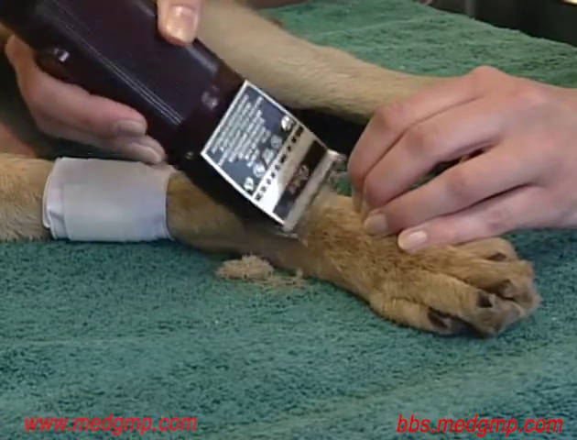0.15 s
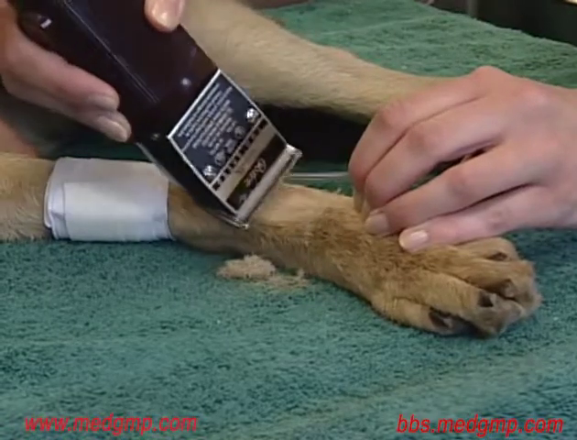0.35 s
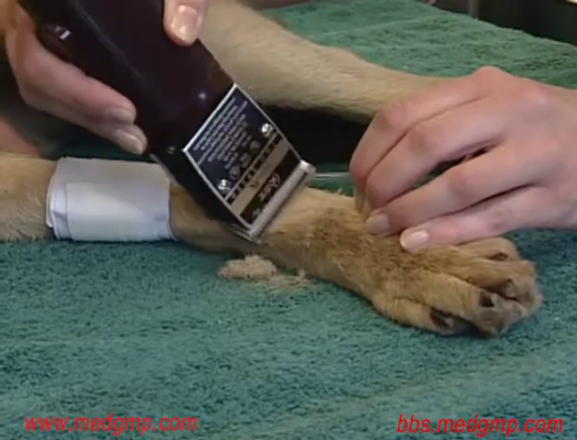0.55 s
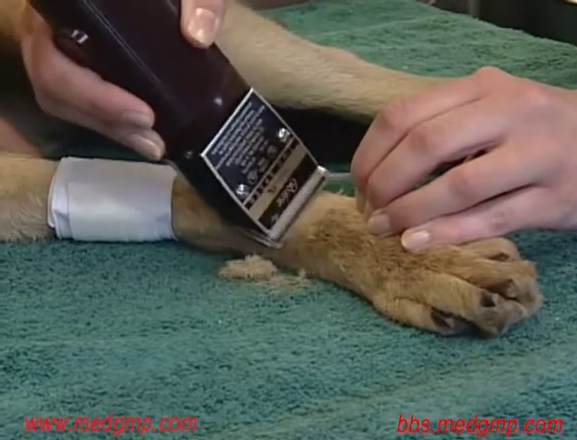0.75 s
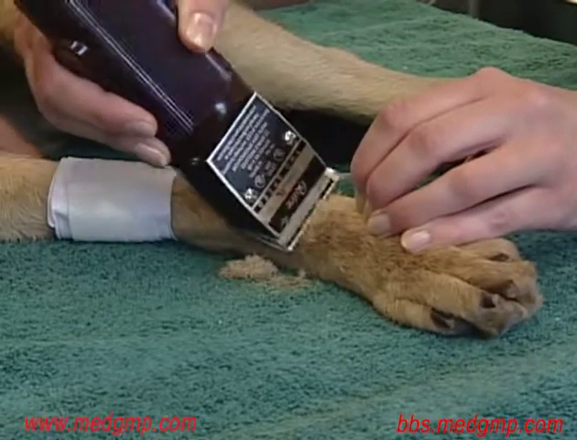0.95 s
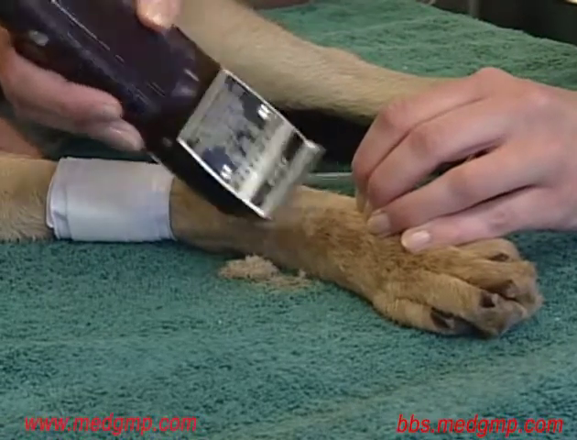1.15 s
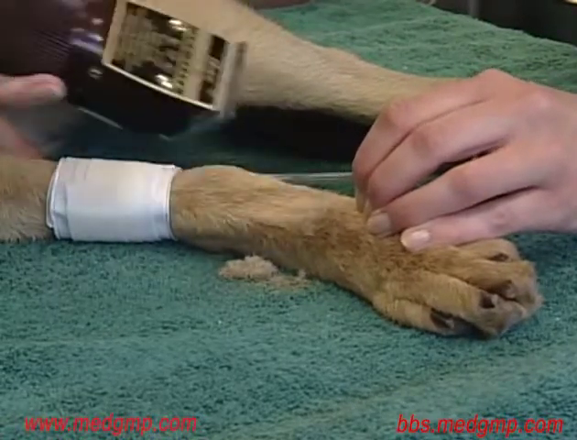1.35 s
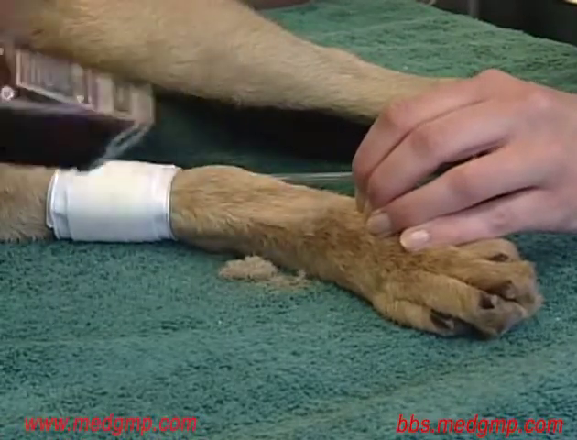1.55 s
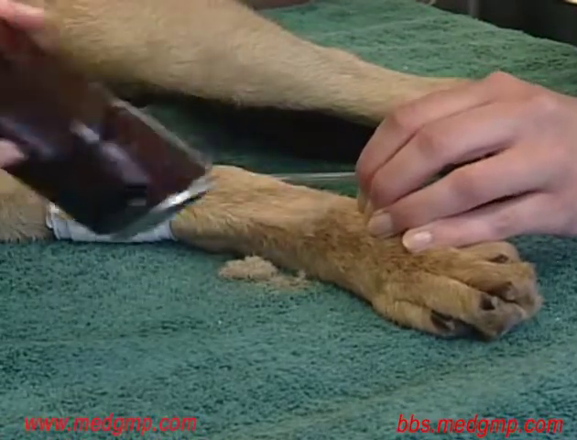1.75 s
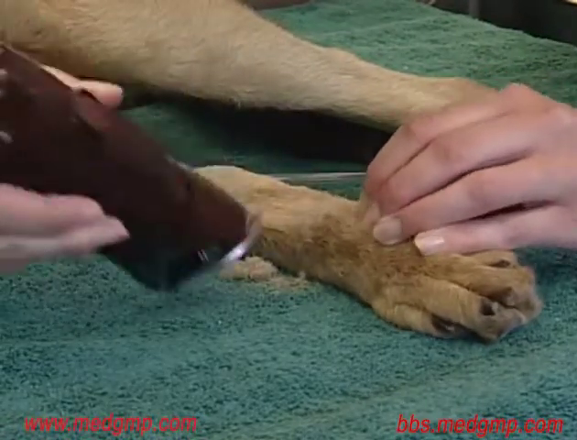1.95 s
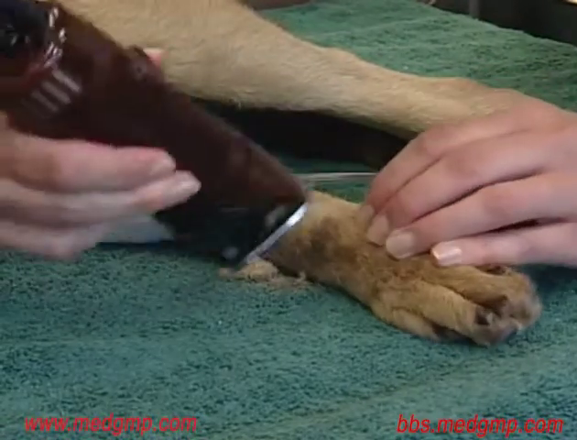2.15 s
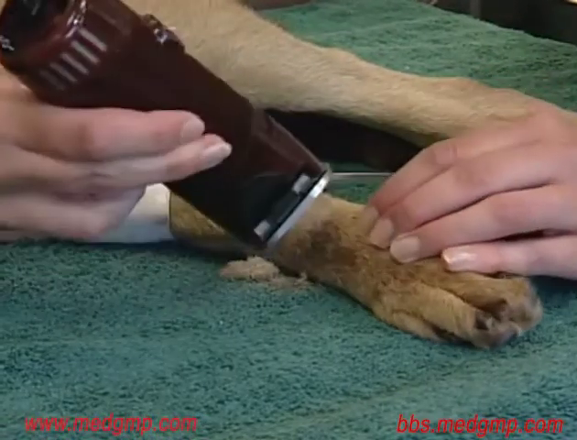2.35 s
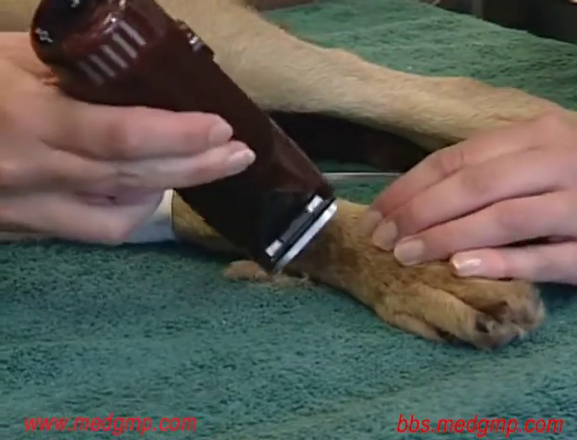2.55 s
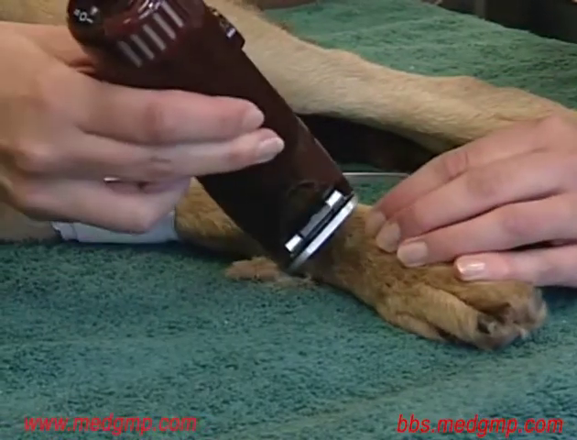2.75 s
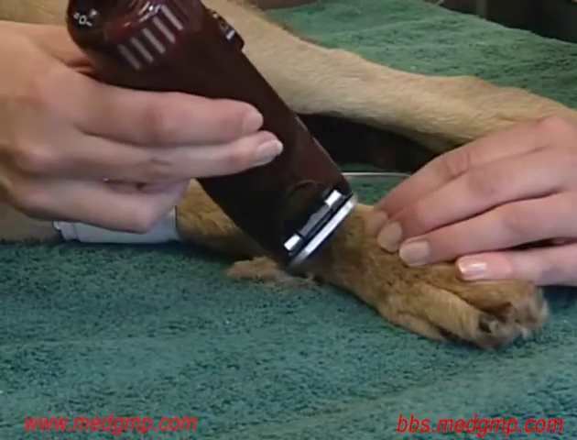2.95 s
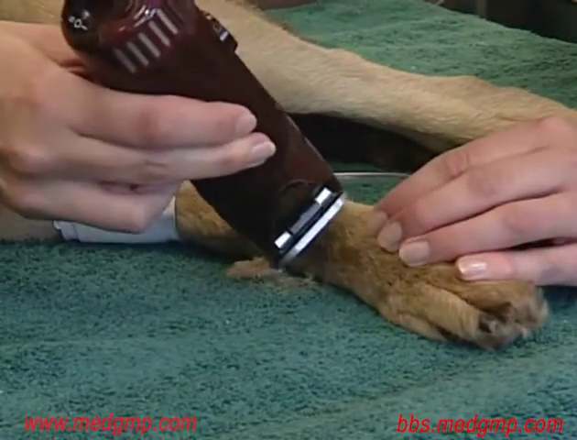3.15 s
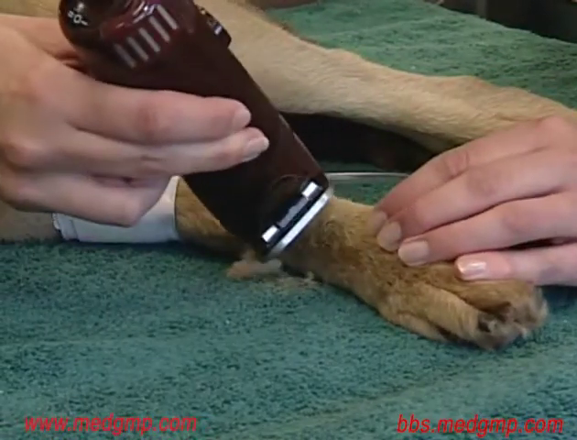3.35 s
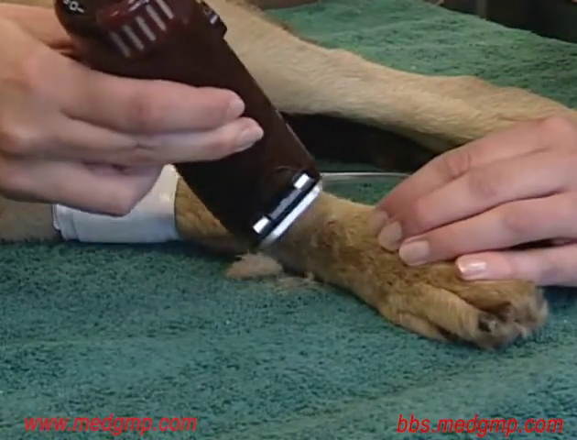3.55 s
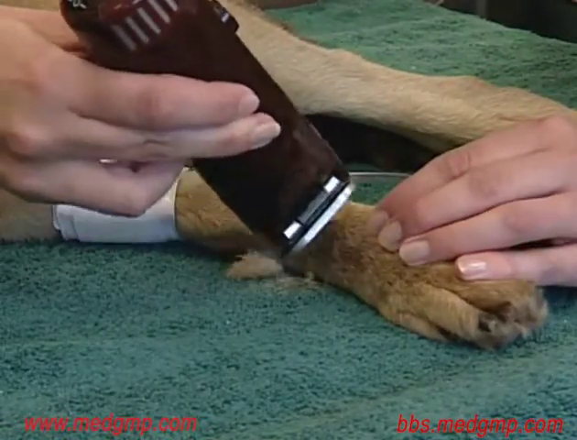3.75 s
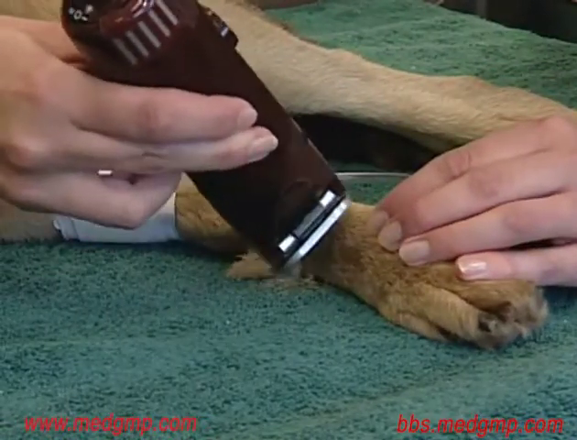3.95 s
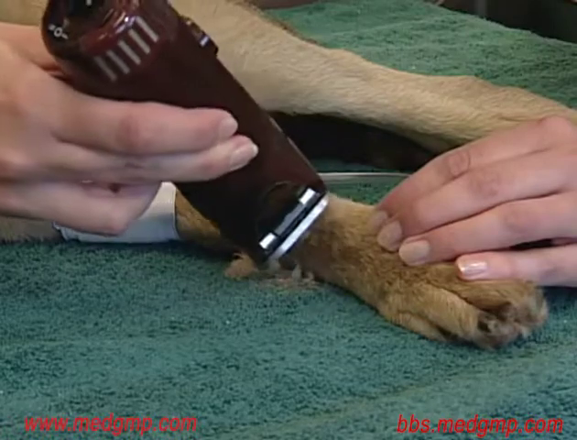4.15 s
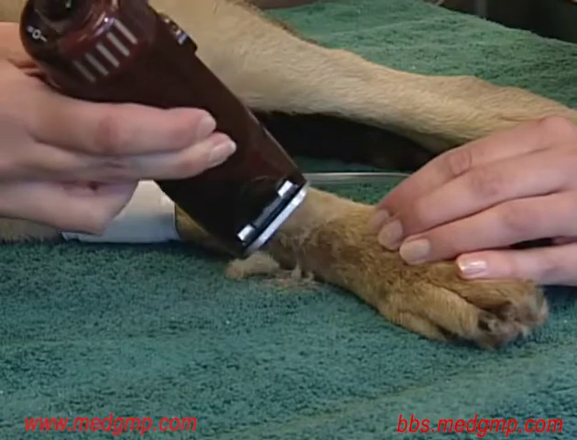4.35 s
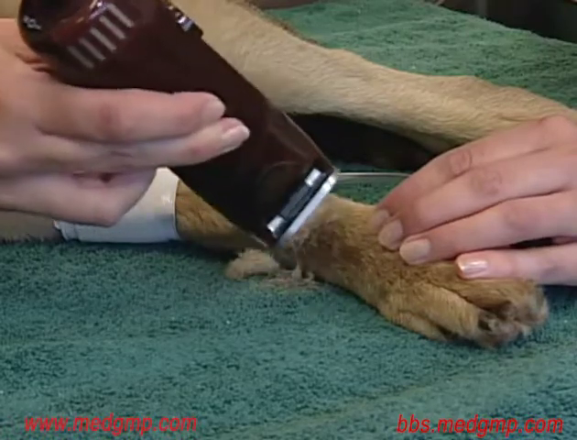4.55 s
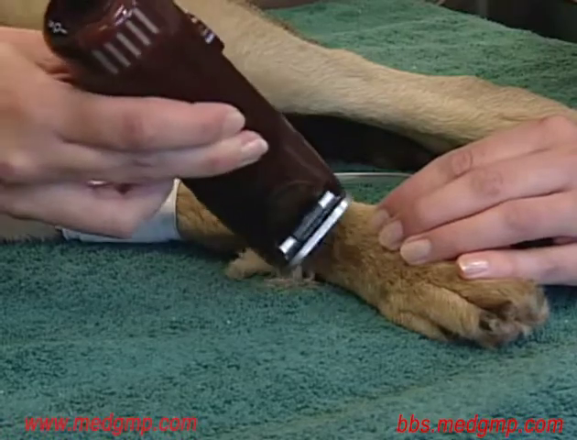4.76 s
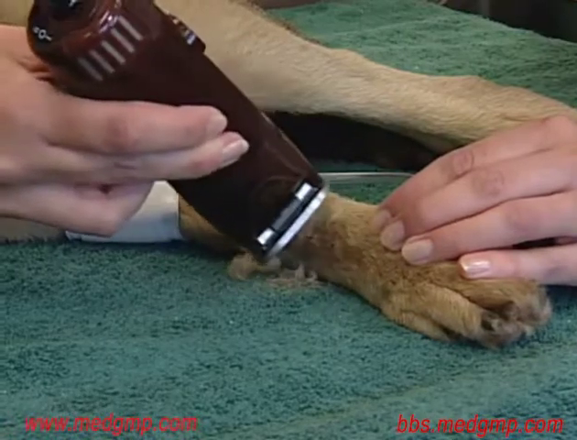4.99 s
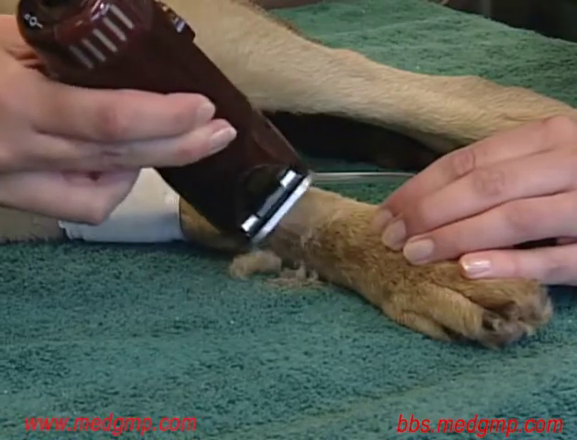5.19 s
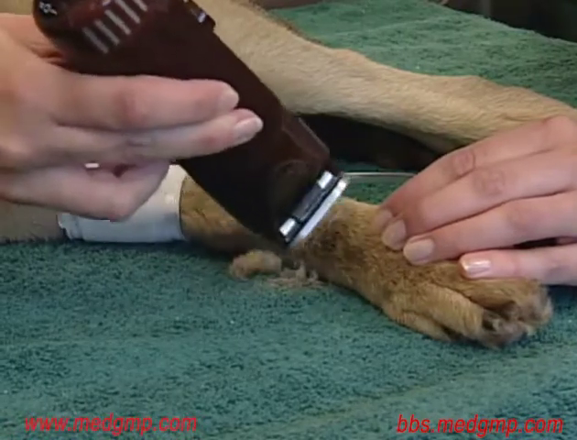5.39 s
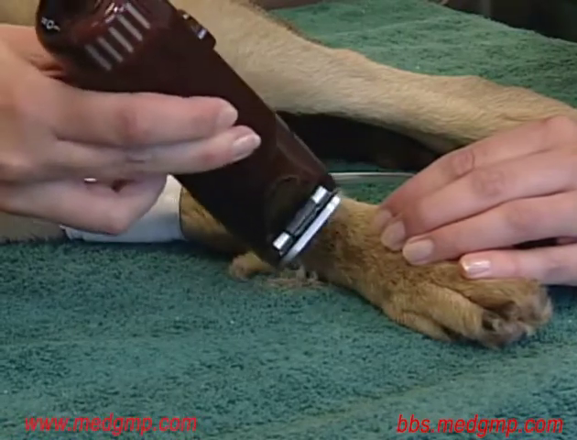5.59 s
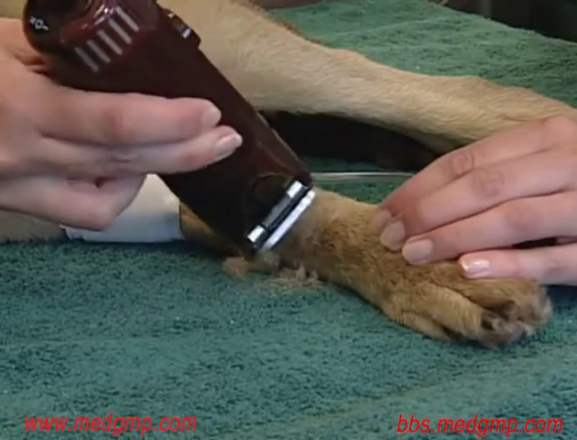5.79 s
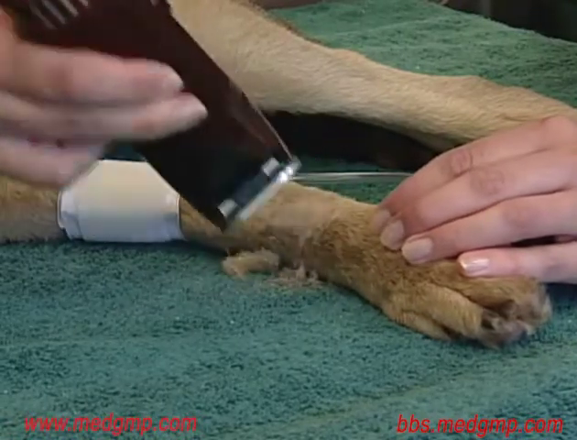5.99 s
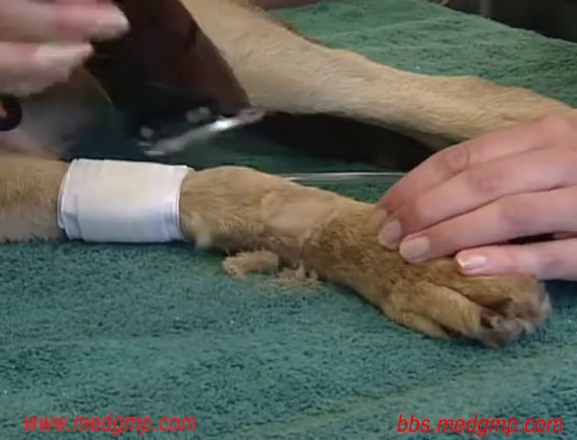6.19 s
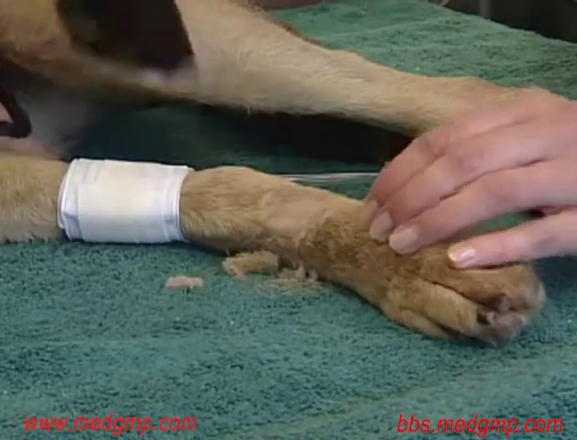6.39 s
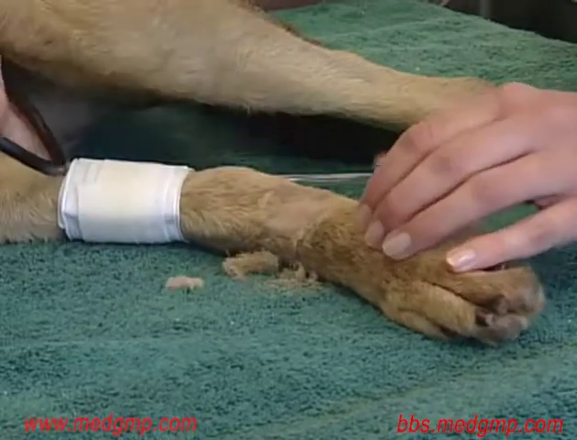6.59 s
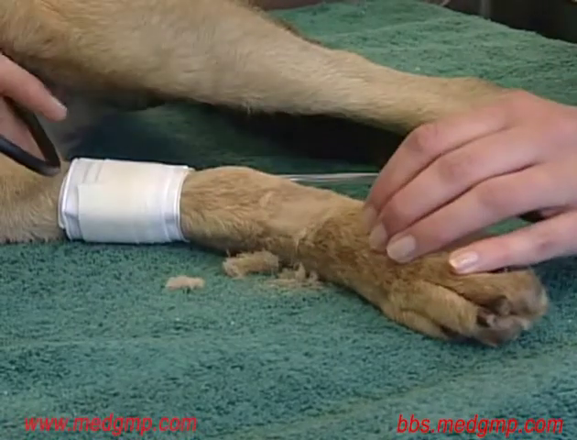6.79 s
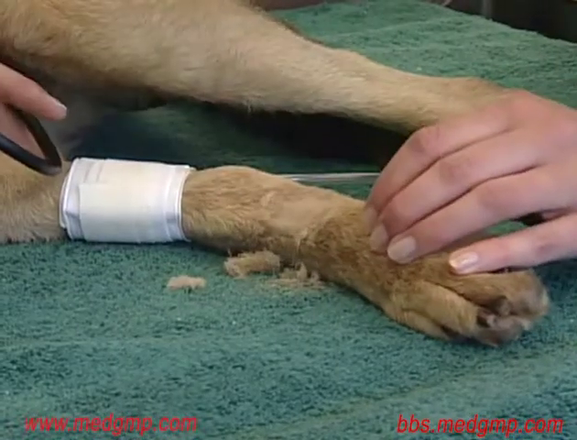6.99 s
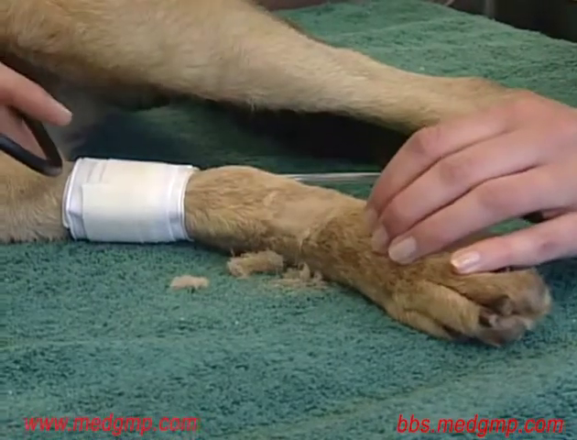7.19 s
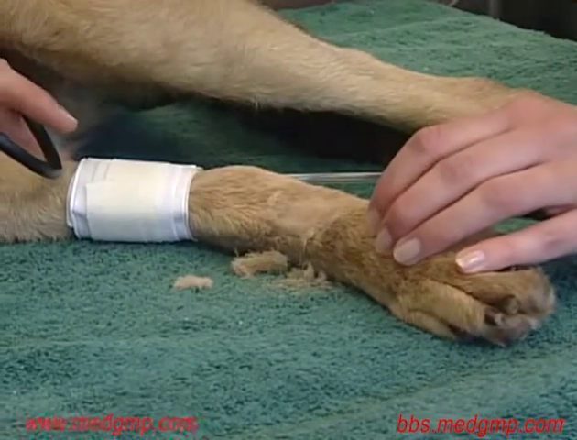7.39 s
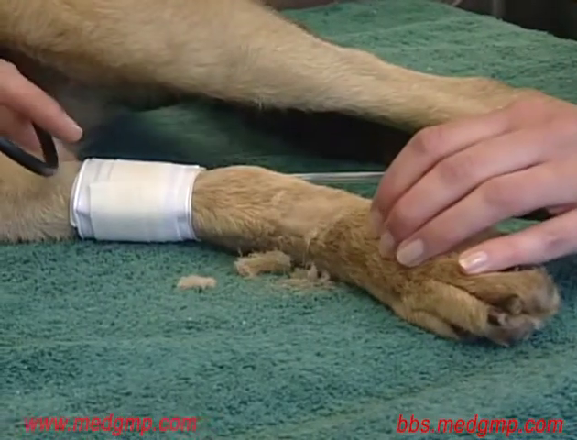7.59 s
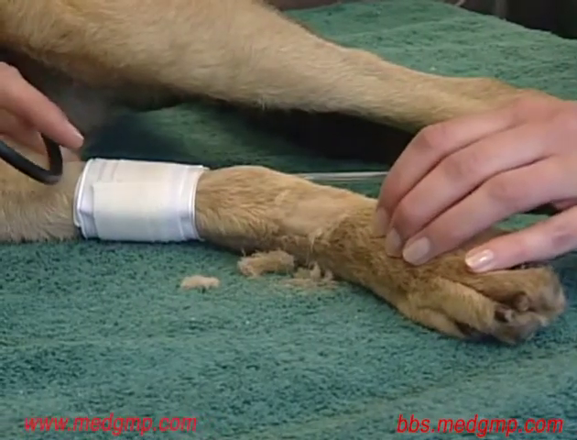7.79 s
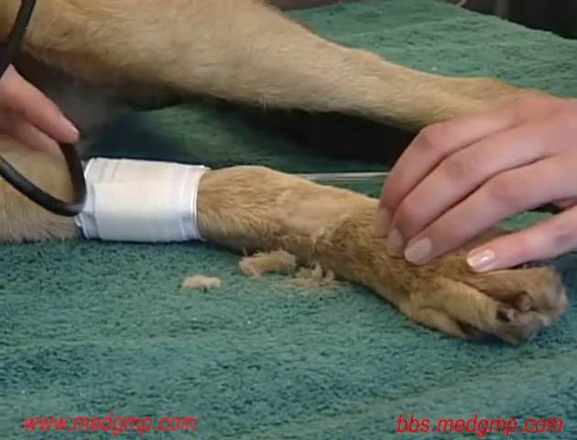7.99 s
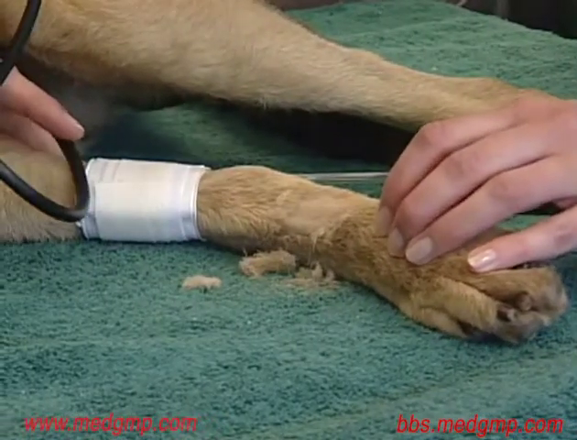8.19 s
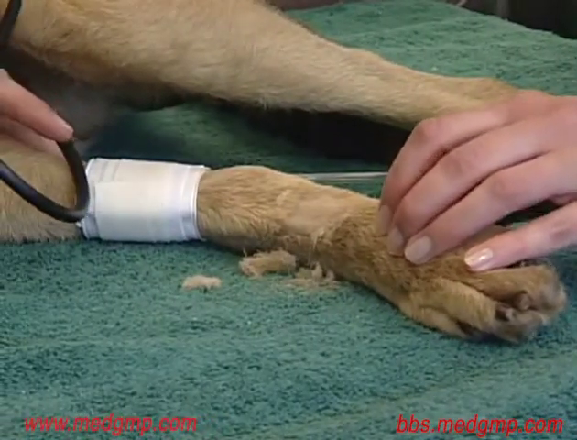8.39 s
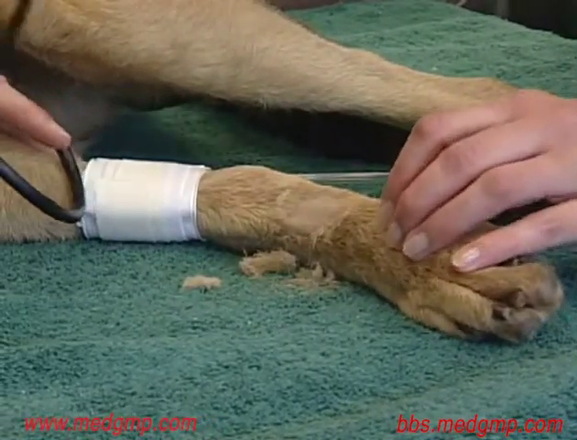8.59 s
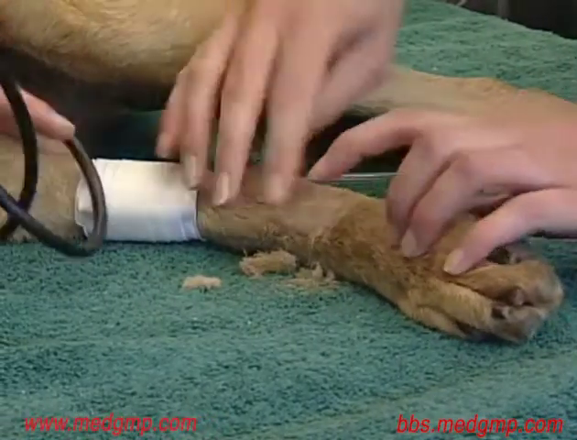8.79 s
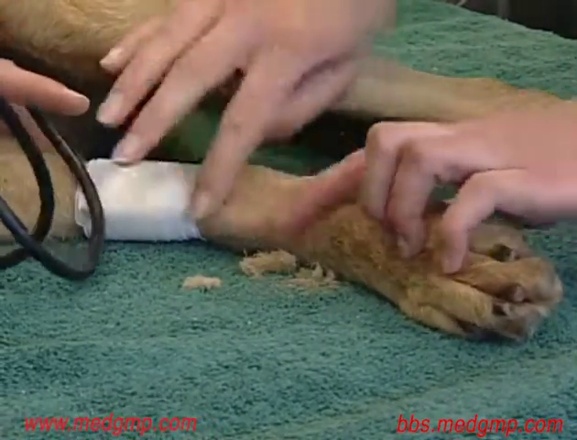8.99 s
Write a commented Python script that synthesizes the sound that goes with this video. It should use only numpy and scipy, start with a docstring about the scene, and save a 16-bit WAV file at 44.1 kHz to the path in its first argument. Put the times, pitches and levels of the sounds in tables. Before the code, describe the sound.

A harsh mains clipper drone with rattling blade and sharp hiss, swelling in fur, abruptly coasts to silence and soft cloth rustles.

```python
"""Dog clippers at work

Electric clippers shave a dog's leg on a towel, then are lifted, switched off and coast to a stop.
A geared mains motor whines in steady tones; the blade knocks at both ends of its stroke (short filtered
pushes) and hisses as it slides (filtered noise). Hands and cord brush and tick softly, during and after.
Underneath lies a quiet room of filtered noise with hum and a thin electronic whistle."""
import sys
import numpy as np
from scipy import signal
from scipy.fft import rfft, irfft, next_fast_len
from scipy.io import wavfile

SR = 44100
rng = np.random.default_rng(int(sys.argv[2]) if len(sys.argv) > 2 else 0)


def store_pcm(level_fs):
    """Save levels as 16-bit WAV."""
    pcm = np.round(np.clip(level_fs, -1, 1) * 32767).astype(np.int16)
    wavfile.write(sys.argv[1], SR, np.atleast_2d(pcm).T)


N = 398650
T = np.arange(N) / SR  # time of every sample, s
STROKES_PER_TURN, MAINS_HZ, TOP_HZ = 3 / 10, 60, 15800
OFF_S, COAST_S, DRAG_S = 6.958, 0.62, 1.3  # switch-off time, coasting time, air drag time constant


def amp(db):
    """Turns decibels into gain."""
    return 10 ** (np.asarray(db) / 20)


def curve(rows):
    """Draws straight lines through (time, value) rows to make a control over time."""
    times, values = np.transpose(rows)
    return np.interp(T, times, values)


def noise():
    """White noise of unit level."""
    return rng.standard_normal(N)


def walk(rate):
    """Random wander with a spread near 1: chance values, `rate` a second, joined by straight lines."""
    knots = rng.standard_normal(4096)
    return np.interp(T * rate, np.arange(len(knots)), knots)


def ramp(start, length):
    """Rises from 0 to 1 over the given time."""
    return np.clip((T - start) / max(length, 1 / SR), 0, 1)


def bell(distance, width):
    """A smooth hump, half as high at half the width to either side."""
    return 0.5 ** ((2 * distance / width) ** 2)


def colour(x, hz, db, size=4096):
    """Causal filter that gives white input of unit level this spectrum in dB per Hz."""
    f = np.maximum(np.arange(size // 2 + 1) * SR / size, 1)
    gain = amp(np.interp(np.log(f), np.log(hz), db)) * np.sqrt(SR / 2)
    # folding the cepstrum onto positive times makes the filter respond without waiting
    cepstrum = irfft(np.log(gain))
    cepstrum[1:size // 2] *= 2
    cepstrum[size // 2 + 1:] = 0
    response = irfft(np.exp(rfft(cepstrum)))
    return signal.oaconvolve(x, response)[:N]


def radiate(x, table, pose, resonances=()):
    """The housing sends a different spectrum, with its resonances more or less exposed, in each pose."""
    hz, *spectra = np.transpose(table)
    f = np.geomspace(20, SR / 2, 1024)
    spectra = np.array([np.interp(np.log(f), np.log(hz), db) for db in spectra])
    for centre, width, *boost in resonances:
        spectra = spectra + np.outer(boost, bell(f - centre, width))
    return sum(np.sqrt(share) * colour(x, f, db) for share, db in zip(pose, spectra))


def impulses(times, sizes):
    """Single-sample pushes at the given times."""
    return np.bincount(np.clip(times * SR, 0, N - 1).astype(int), sizes, N)


def decay(x, seconds):
    """Gives every push an exponential tail."""
    return signal.lfilter([1], [1, -np.exp(-1 / (seconds * SR))], x)


def disperse(x, lag_s, at_hz=1000):
    """Bending waves cross the housing faster the higher they are, which spreads a blow out in time."""
    f = np.arange(N // 2 + 1) * SR / N
    phase = 2 * np.pi * 2 * lag_s * np.sqrt(f * at_hz)
    return irfft(rfft(x) * np.exp(-1j * phase), N)


# moves of the hand, starting from blade plate up: t/s, length/s,
# shares reached (0-1) of plate up, turning over, lifted; what remains is nose down in the fur
HAND_MOVES = [(1.11, 0.2, 0.17, 1, 0.033), (1.47, 0.096, .04, 0.71, 0.33), (1.96, 0.22, 0.23, 0.064, 0),
              (2.399, 1.16, 0.03, 0, 0), (6.025, 0.095, 0.39, 0.38, 0.17), (6.18, 0.073, 0.01, 0.021, 1),
              (6.606, 1.5, 0, .22, .78)]


def held_pose():
    """Shares of plate up, turning over, nose down and lifted; each move blends into the next hold."""
    shares = np.outer([1, 0, 0], np.ones(N))
    for start, length, *reached in HAND_MOVES:
        target = np.clip(reached, 0, 1)[:, None]
        shares = shares + ramp(start, length) * (target - shares)
    plate_up, turning, lifted = shares
    nose_down = np.maximum(1 - plate_up - turning - lifted, 0)
    return np.array([plate_up, turning, nose_down, lifted])


def speed_share():
    """Full speed under power; without current, friction and air drag stop the armature."""
    coast = np.maximum(T - OFF_S, 0)
    return np.maximum(1 - coast / COAST_S, 0) * np.exp(-coast / DRAG_S)


# turns a second of the motor shaft, before the slowing of the coast: t/s, f/Hz
SHAFT_SPEED = [(0.3, 251.38), (1.1, 252.79), (1.7, 255.0), (1.9, 256.72), (2.9, 256.71), (3.5, 252.71),
               (3.9, 254.21), (4.5, 253.62), (4.7, 254.84), (5.3, 254.02), (5.5, 254.96), (6.3, 255.52)]


def shaft_turns():
    """Adds up the shaft speed to get the turns made so far."""
    return np.cumsum(curve(SHAFT_SPEED) * speed_share()) / SR


# passes through the fur: start t/s, time to bite in/s, end t/s, release/s,
# added rattle level/dB, added hiss level/dB (both before the build-up of fur)
FUR_PASSES = [(-.1, .05, 0.95, 0.25, 4.5, 3.6), (1.852, 0.51, 3.22, 0.11, 3.5, 4),
              (3.22, 0.15, 4.98, 0.04, 4.5, 4.5), (5.0, 0.19, 5.92, 0.2, 3.5, 3.3)]
BUILD_DB_PER_S = 0.95  # a pass grows louder as fur piles up in front of the blade
# rattle and hiss in dB: running light, added when held clear of the leg, added with the current off
LIGHT_DB, CLEAR_DB, UNPOWERED_DB = (-4.5, -3), (6, 5.5), (-2, -2.5)
# both fall as powers of the speed; the hiss holds up until the speed nears the knee (share of full)
RATTLE_POWER, HISS_POWER, HISS_KNEE = 1.55, 2.6, 0.32


def blade_work(lifted, slack_s=0.027):
    """Rattle and hiss in dB: both grow in the fur or held clear, and die away with the speed."""
    db = np.array(LIGHT_DB)[:, None] + np.outer(CLEAR_DB, lifted)
    db = db + np.outer(UNPOWERED_DB, ramp(OFF_S, slack_s))
    for start, bite, end, release, *added_db in FUR_PASSES:
        in_fur = ramp(start, bite) * (1 - ramp(end, release))
        db = db + in_fur * (np.array(added_db)[:, None] + BUILD_DB_PER_S * (T - start))
    speed = np.maximum(speed_share(), 1e-3)
    slowing = [speed ** RATTLE_POWER, np.tanh(speed / HISS_KNEE) ** HISS_POWER]
    return db + 20 * np.log10(slowing)


# the hardest blade knocks, before a common boost and the housing: t/s, level/dB
HARD_KNOCKS = [(0.7297, -21), (0.8101, -14.5), (0.9009, -14.5), (1.3369, -17), (1.3758, -15.5),
               (1.6776, -19), (2.392, -16), (3.0415, -15), (3.2505, -16), (4.2752, -10), (4.4333, -14.5),
               (4.7745, -12), (4.8264, -16), (5.9918, -14), (6.1609, -15), (6.2267, -19), (6.2652, -14),
               (6.3435, -14), (6.3829, -14), (6.4991, -12), (6.7745, -12.5), (6.7865, -15)]
# how the housing colours a knock, before its loudness:
# f/Hz, level/dB (per Hz) for plate up, turning, nose down, lifted
KNOCK_SPECTRA = [(199, -87.5, -89, -94, -105), (530, -76.5, -83, -74, -81),
                 (1020, -84.5, -87, -84.5, -82.5), (1540, -76.5, -73.5, -72.5, -81.5),
                 (2010, -69.5, -72, -71.5, -72.5), (2360, -72, -81.5, -74.5, -75),
                 (3500, -72.5, -80, -77.5, -67), (4830, -74, -77.5, -77, -76),
                 (6070, -75.5, -80, -76.5, -86), (7650, -92, -93, -112, -105),
                 (13600, -99, -103, -102, -101)]


def knocks(turns, pose, rattle_db, scatter_db=2.67, chatter_s=0.0012, hard_db=19.0,
           blow_db=-3.5, chatter_db=-3.0):
    """The drive takes up its play at each reversal: a blow of fixed shape, then brief random chatter."""
    strokes = turns * STROKES_PER_TURN
    k = np.arange(int(strokes[-1]))
    chance = rng.standard_normal((1024, 2))[:len(k)]
    times = np.interp(k + 0.0704 + 0.05 * (k % 2), strokes, T)  # out and back differ a little
    times = times + 0.00004 * chance[:, 0]
    sizes = amp(np.interp(times, T, rattle_db) + scatter_db * np.minimum(chance[:, 1], 1))
    for s, db in HARD_KNOCKS:
        nearest = np.argmin(abs(times - s))
        sizes[nearest] = amp(db + hard_db)
    blows = disperse(impulses(times - 0.002, sizes), 0.0045)
    # two tails in a row make the chatter swell, then fade; the division gives it unit energy
    burst = decay(decay(impulses(times, sizes), chatter_s), chatter_s)
    burst = burst / np.sqrt((chatter_s * SR) ** 3 / 4)
    push = amp(blow_db) * blows + amp(chatter_db) * burst * np.sign(noise())
    spacing = OFF_S * SR / len(k)  # samples per knock, evens out the power
    return radiate(push * np.sqrt(spacing), KNOCK_SPECTRA, pose)


# running noise of blade and gears, before its loudness:
# f/Hz, level/dB (per Hz) for plate up, turning, nose down, lifted
RUNNING_SPECTRA = [(40.0, -105.0, -105.0, -105.0, -105.0), (103, -96, -78, -96, -94),
                   (253, -80, -86, -84, -90), (517, -77.5, -77, -80, -82), (1240, -76, -80.5, -74, -81),
                   (2700, -75.5, -76.5, -77, -74.5), (4970, -74, -78, -70.5, -75.5),
                   (6270, -68, -81, -79, -77.5), (8970, -77, -79, -81, -84.5),
                   (10250, -81, -87, -81.5, -81), (12250, -79, -81, -76.5, -81.5),
                   (15400, -86, -93, -81, -87)]
# blade and housing resonances: f/Hz, width/Hz, boost level/dB for plate up, turning, nose down, lifted
HOUSING_RESONANCES = [(945, 230, 1, 5, 2.5, 9.5), (1970, 160, 2, 5, 5.5, -9.5),
                      (3210, 410, 4, -15, -3.5, 6.5), (4135, 380, 4, 11, 3.5, 3.5),
                      (6080, 390, -1.5, 0, 3.5, 2.5), (7290, 480, 10.5, 5, 0.5, 8),
                      (7810, 680, 0.8, 11, 2, 1), (11030, 470, 4, 7, 1, 4), (11300, 430, -5.5, 1, 1.5, -7),
                      (13060, 900.0, 7, 3, -3.5, 3), (14100, 900.0, 1, 7, 4, 1)]


def running_noise(turns, pose, rattle_db, hiss_db, split_hz=6000, mains_depth=0.046,
                  stroke_depth=0.097, grain_db=0.85, noise_db=-1.02):
    """Gears churn and the blade slides; brushes fizz with each half wave of the mains."""
    fizz = 1 + mains_depth * (T < OFF_S) * np.cos(2 * np.pi * 2 * MAINS_HZ * T)
    slide = 1 + stroke_depth * np.cos(2 * np.pi * (turns * STROKES_PER_TURN - 0.2))
    grain = amp(noise_db + grain_db * walk(500))
    sound = radiate(noise() * fizz * slide * grain, RUNNING_SPECTRA, pose, HOUSING_RESONANCES)
    # the rattle level drives the lows, the hiss level the highs
    low = signal.sosfiltfilt(signal.butter(2, split_hz, fs=SR, output="sos"), sound)
    return low * amp(rattle_db) + (sound - low) * amp(hiss_db)


# each blade band also swings in level with chance
def lobes(x, moving, held_db=1.0, moving_db=2.5, full_hz=7500, count=24):
    """Treble leaves the housing in narrow lobes: bands swell and fade, faster while it is swung about."""
    size = next_fast_len(N)
    f = np.arange(size // 2 + 1) * SR / size
    spectrum, out = rfft(x, size), 0
    centres, spacing = np.linspace(0, TOP_HZ, count, retstep=True)
    swing = np.array([held_db * walk(2.83) + moving_db * moving * walk(11) for _ in range(count + 1)])
    # what one lobe gains, its neighbour loses
    for hz, db in zip(centres, np.diff(swing, axis=0) / np.sqrt(2)):
        band = irfft(spectrum * np.maximum(1 - abs(f - hz) / spacing, 0), size)[:N]
        out = out + band * amp(min(hz / full_hz, 1) * db)
    return out


# motor tones, before a common trim and flicker:
# multiple of the shaft speed, level/dB for plate up, turning, nose down, lifted
SHAFT_TONES = [(1, -58, -64, -67, -70), (2, -58, -59, -70, -63), (3, -62, -63, -57, -61),
               (6, -48, -51, -49, -60), (9, -60, -70, -62, -58), (12, -48, -70, -62, -53),
               (20, -52, -59, -53, -60), (21, -54, -70, -55, -69), (23, -48, -56, -57, -64),
               (25, -56, -59, -54, -64), (29, -46, -57, -51, -61), (32, -54, -58, -57, -70),
               (47, -66, -70, -61, -70)]
# slot whine, each of its three lines before lean and flicker: t/s, level/dB
SLOT_WHINE = [(0, -49), (1.15, -50), (1.45, -45), (1.8, -54), (2.15, -39.5), (3.25, -39), (3.75, -47),
              (4.2, -44.5), (4.85, -40.5), (5.2, -47), (5.7, -43), (6.05, -41.5), (6.2, -49), (6.38, -41),
              (6.95, -49)]
# the motor's high whistle, before flicker: level/dB for plate up, turning, nose down, lifted
MOTOR_WHISTLE = (-43, -43.5, -58, -45.5)
WHINE_ORDER, WHISTLE_ORDER = 16, 24  # multiples of the shaft speed


def motor_tones(turns, pose, wobble_turns=0.001, flicker_db=1.7, tones_db=-0.7, whistle_flicker_db=2.5):
    """Shaft harmonics, a slot whine that the mains splits into three lines, and a higher whistle."""
    angle = 2 * np.pi * (turns + wobble_turns * walk(45))
    whine = amp(curve(SLOT_WHINE))
    whistle = amp(np.array(MOTOR_WHISTLE) @ pose + whistle_flicker_db * walk(5.7))
    out = whistle * np.sin(WHISTLE_ORDER * angle)
    for order, *db in SHAFT_TONES:
        level = np.sqrt(amp(db) ** 2 @ pose) * amp(tones_db + flicker_db * walk(14))
        out = out + level * np.sin(order * angle + rng.uniform(0, 2 * np.pi))
    for side in (-1, 0, 1):
        shift = side * 2 * np.pi * 2 * MAINS_HZ * T
        lean_db = -(4 * side + 2) * pose[0]  # plate up, the lowest line carries best
        out = out + whine * amp(lean_db + 1.1 * walk(13)) * np.sin(WHINE_ORDER * angle + shift)
    powered = np.exp(-np.maximum(T - OFF_S, 0) / 0.035)  # fades quickly without current
    return np.sqrt(2) * out * powered


# the quiet room's noise, before a small flicker: f/Hz, level/dB (per Hz)
ROOM_SPECTRUM = [(25, -102), (45, -100), (65, -78), (125, -75), (200, -78), (330, -81.5), (460, -75.5),
                 (700, -88.5), (1500, -99.5), (4000, -103), (8000, -108), (15000, -109)]
TUBE_WHISTLE_HZ = 15734


def room(whistle_db=-63, hum_db=-66):
    """Ventilation rumble, mains hum and the line whistle of a picture tube."""
    air = colour(noise() * amp(0.91 * walk(5.3)), *np.transpose(ROOM_SPECTRUM))
    whistle = amp(whistle_db + 0.99 * walk(5)) * np.sin(2 * np.pi * TUBE_WHISTLE_HZ * T)
    hum = amp(hum_db) * np.sin(2 * np.pi * 2 * MAINS_HZ * T)
    return air + np.sqrt(2) * (whistle + hum)


# hands and cord brush the towel: middle t/s, length/s, level/dB (relative to the towel spectrum)
TOWEL_BRUSHES = [(1.7, 0.43, -4.5), (2.6, 0.27, -8), (4.05, 0.68, -5), (4.848, 0.25, -7), (7.33, 0.062, -3),
                 (7.825, 0.22, -2), (8.506, 0.15, 1.5), (8.72, .35, -2.5)]
REST_DB = -17.5  # rubbing level between brushes, on the same scale
# rubbing on the towel, before the brush level: f/Hz, level/dB (per Hz)
TOWEL_SPECTRUM = [(30, -95), (70, -71.5), (130, -68), (250, -73), (480, -80), (800, -81), (1500, -87),
                  (3000, -96.5), (7000, -99.5), (15000, -108)]
# small handling ticks, before the tick and thud gains: t/s, level/dB
HANDLING_TICKS = [(7.9147, -34), (8.6183, -29.5), (8.9026, -36), (8.963, -25.5)]


def handling(grain_db=2.0, tick_db=-6.0, tick_s=0.00044, thud_db=-13, thud_hz=430, thud_s=0.011):
    """Soft brushes over the towel that swell and fade, and a few ticks, each with a small thud."""
    power = amp(REST_DB) ** 2
    for middle, length, db in TOWEL_BRUSHES:
        power = power + amp(db) ** 2 * bell(T - middle, length)
    rub = colour(noise() * np.sqrt(power) * amp(grain_db * walk(50)), *np.transpose(TOWEL_SPECTRUM))
    s, db = np.transpose(HANDLING_TICKS)
    taps = impulses(s, amp(db))
    ticks = decay(taps, tick_s) * noise()
    ring = np.sin(2 * np.pi * thud_hz * T) * np.exp(-T / thud_s)
    thuds = signal.fftconvolve(taps, ring)[:N]
    return rub + amp(tick_db) * ticks + amp(thud_db) * thuds


# harmonics that fall through a housing resonance as the motor coasts:
# multiple of the shaft speed, centre f/Hz, width/Hz, level/dB (before flicker), phase roughness/rad
COASTING_TONES = [(6, 1000, 160, -44, .5), (48, 5000, 700, -47.5, 2.6)]


def run_down(turns, flicker_db=3, rough_rate=400):
    """As the motor slows, its harmonics sing out briefly where they cross a housing resonance."""
    shaft_hz, out = np.gradient(turns) * SR, 0
    for order, centre_hz, width_hz, db, rough in COASTING_TONES:
        phase = 2 * np.pi * order * turns + rough * walk(rough_rate)
        tone = amp(db + flicker_db * walk(90)) * np.sin(phase)
        out = out + tone * np.exp(-((order * shaft_hz - centre_hz) / width_hz) ** 2)
    return out


def scene():
    """Adds up the clippers, the hands and the room."""
    pose = held_pose()
    _, turning, _, lifted = pose
    rattle_db, hiss_db = blade_work(lifted)
    turns = shaft_turns()
    blade = knocks(turns, pose, rattle_db) + running_noise(turns, pose, rattle_db, hiss_db)
    clippers = lobes(blade, turning + lifted) + motor_tones(turns, pose) + run_down(turns)
    return (clippers + room() + handling())[None]


def record(dry):
    """The recorder cuts the top with a steep low-pass filter."""
    return signal.sosfilt(signal.ellip(12, 0.1, 80, TOP_HZ, fs=SR, output="sos"), dry)


dry = scene()
out = record(dry)
store_pcm(out)
```